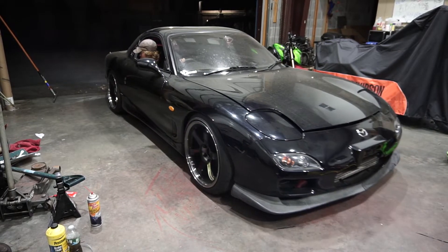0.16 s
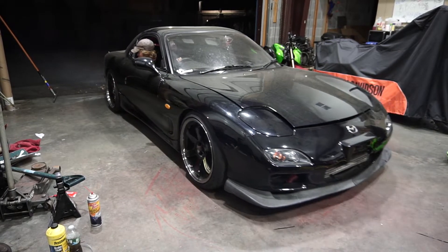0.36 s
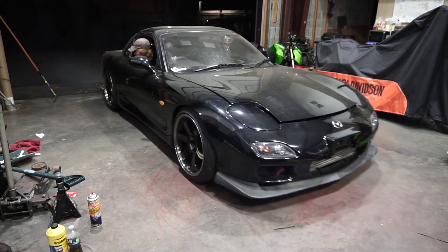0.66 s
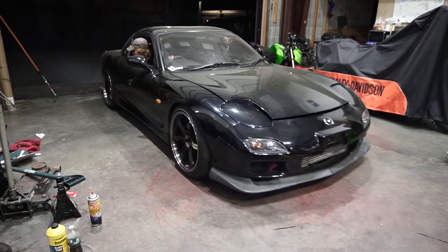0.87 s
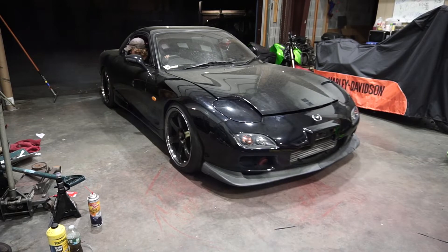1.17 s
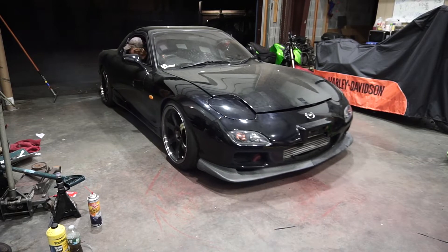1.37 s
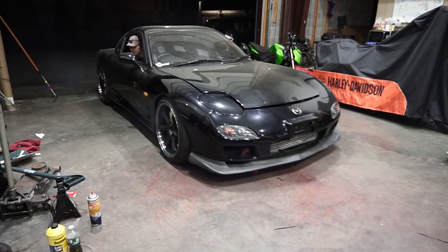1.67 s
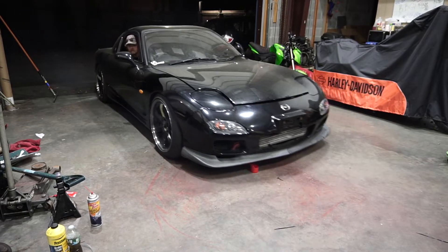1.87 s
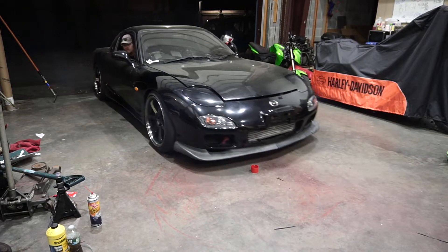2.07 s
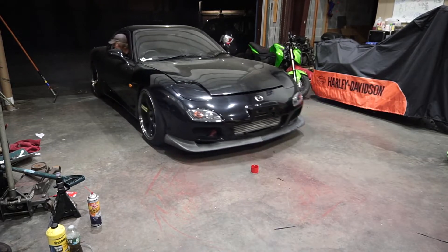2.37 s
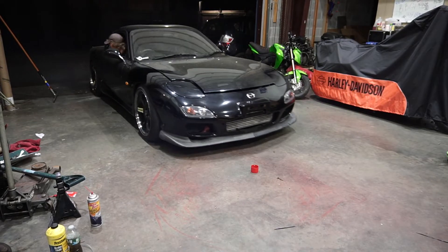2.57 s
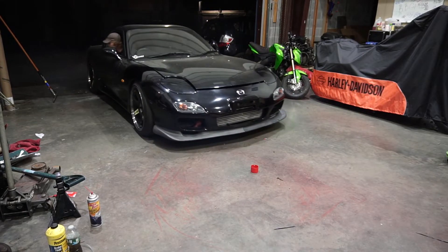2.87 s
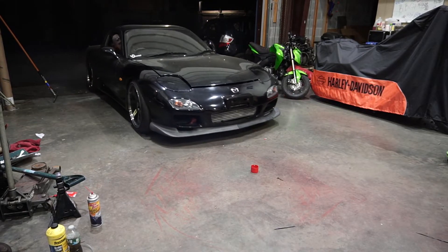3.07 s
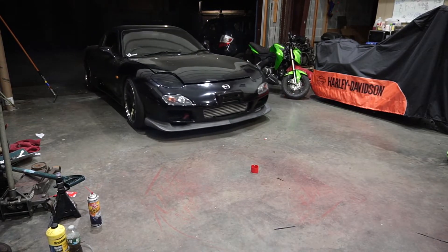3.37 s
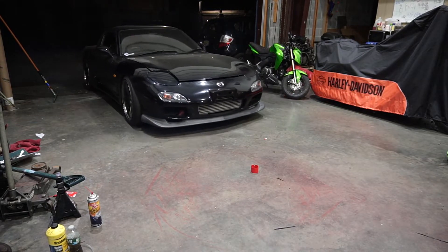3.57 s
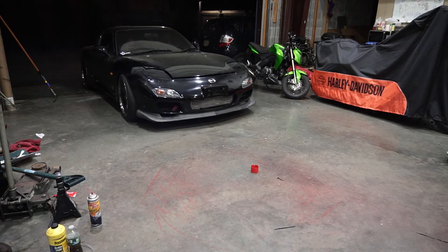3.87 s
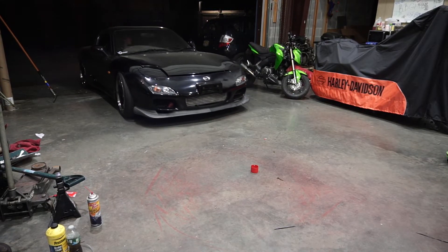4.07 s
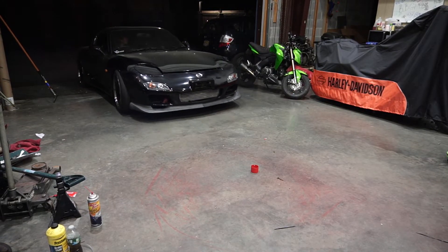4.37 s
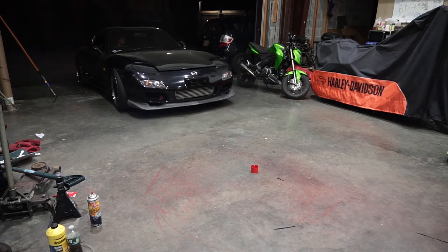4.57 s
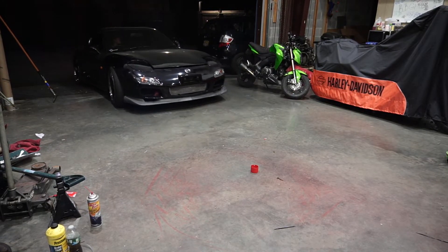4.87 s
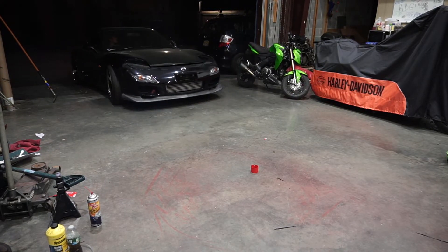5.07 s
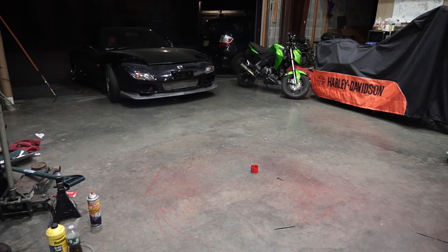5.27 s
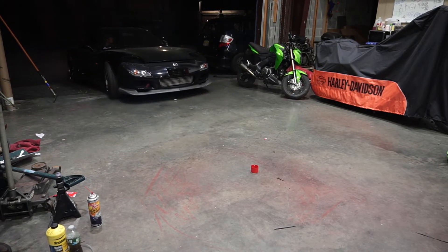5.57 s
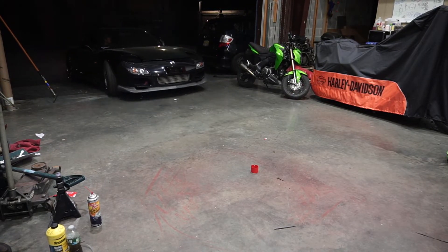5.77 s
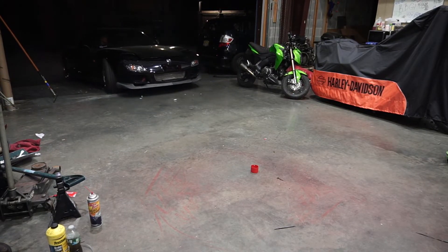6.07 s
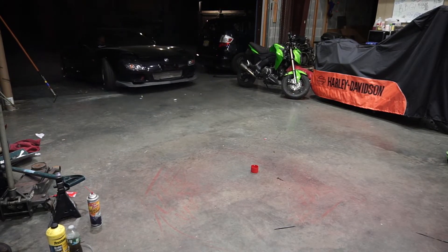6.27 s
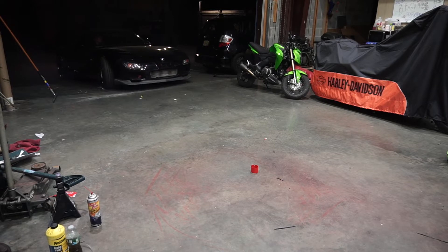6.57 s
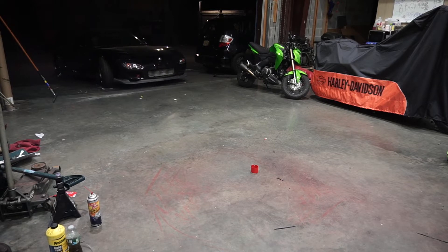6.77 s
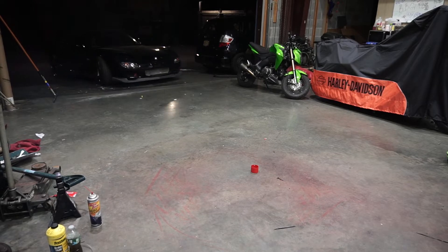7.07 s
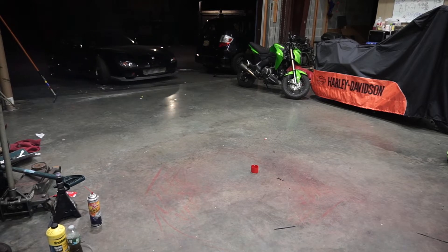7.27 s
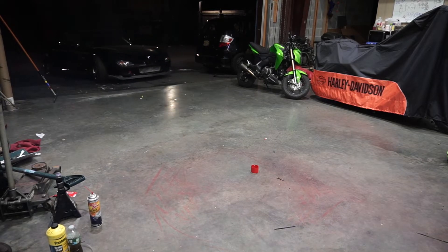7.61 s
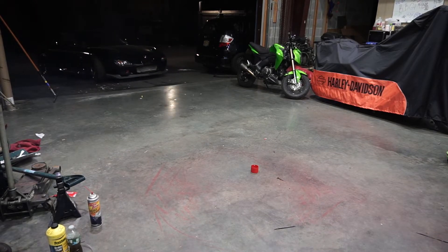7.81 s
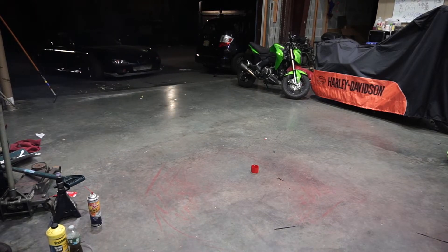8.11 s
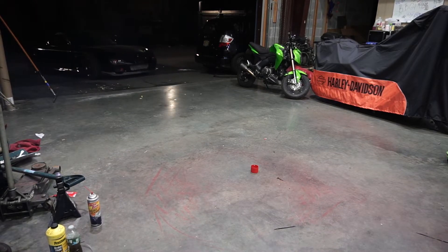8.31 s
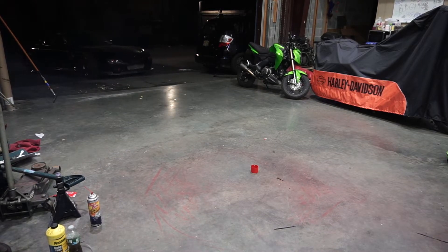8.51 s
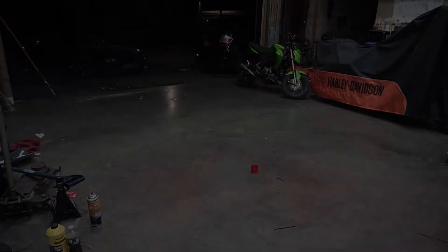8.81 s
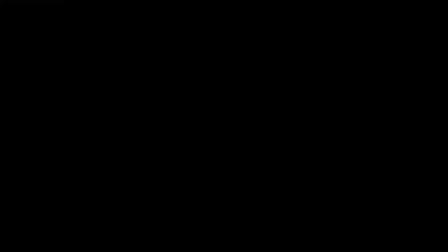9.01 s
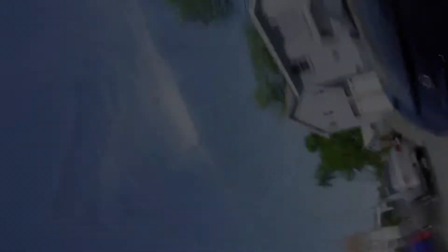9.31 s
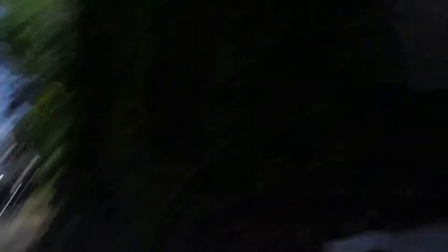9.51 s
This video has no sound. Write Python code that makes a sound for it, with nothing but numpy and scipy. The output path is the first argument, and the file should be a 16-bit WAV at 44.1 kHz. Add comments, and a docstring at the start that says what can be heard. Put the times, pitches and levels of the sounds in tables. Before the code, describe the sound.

From 0 s a rotary-engined car idles loudly near a fixed microphone in a concrete workshop. Its exhaust fires in uneven clumps of hollow, ringing pops, roughly two to five at a time, separated by misfire gaps; runs often start weak and end strong. Rough mechanical clatter and a low throb lie beneath, with gas hiss and metallic panel buzz. As the car backs away, the rhythm quickens slightly from about 2.4 s and a bright crack follows each pop from a wall, strongest between 3 and 6 s, its delay shrinking. A thin, high brake squeal flutters faintly at 2.7-3.1 s. By 7-8.7 s the chopping is weaker and more distant, in regular lumps with short room tails. Around 8.9 s wind swells in; from 9.1 to 9.65 s heavy low buffeting, roar, ticks and plastic rattles overwhelm the engine, clipping at peaks.

```python
"""A rotary-engined car with a choppy idle backs out of a workshop: uneven runs of pops between misfires ring its pipe.
Each pop returns from a wall behind the car as a bright crack, sooner as the car nears the wall; gas hisses and panels
buzz after it. Engine-bay noise is puffed once per chamber over a sine throb, and a brake squeals once as a fluttering
tone. Sparse tails give the room. At the end the workshop dips away under noise swings, roar and rattles: a microphone
buffeted by wind on a moving car."""
import sys
import numpy as np
from scipy import signal
from scipy.fft import rfft, irfft, next_fast_len
from scipy.io import wavfile
from scipy.ndimage import uniform_filter1d

SR = 44100
rng = np.random.default_rng(int(sys.argv[2]) if len(sys.argv) > 2 else 0)


def dump(signal):
    """Clip the signal to [-1, 1] and save it as 16-bit WAV at the path in sys.argv[1]."""
    limited = np.clip(np.atleast_2d(signal).T, -1, 1)
    pcm = np.round(limited * 32767).astype(np.int16)
    wavfile.write(sys.argv[1], SR, pcm)


N = 425560

# The car backing away: (time [s], chambers passing [1/s], wall echo delay [ms],
# surge: how far the spacing of the pops tightens through a run [share])
CAR_MOTION = [(0.0, 40.7, 73.0, .03), (.4, 41.3, 72.4, .10), (0.6, 41.6, 72.0, .06), (1.2, 46.4, 70.6, .07),
              (1.8, 35.1, 69.1, 0), (2.05, 38, 68.1, .11), (2.4, 42.2, 66.8, .02), (3.6, 46.9, 62.8, .04),
              (4.2, 51.4, 60.5, .05), (6.0, 53.5, 52.2, .02), (8.4, 53.9, 40.7, .04),
              (9.0, 52.0, 38.9, .04)]


def exhaust():
    """Every pop rings the pipe, cracks off the wall, hisses and shakes the panels; a weak one loses more crack than thump."""
    # Pop and wall crack before the mix: (time [s], pop level [dB], crack level [dB])
    pop_levels = [(0.0, -4, -30), (1.2, -2.5, -21.5), (1.5, -4.5, -20.5), (1.8, -6, -40),
                  (2.1, -5.5, -19.5), (2.6, -7, -25), (2.9, -4.5, -14.5), (3.1, -3, -12), (5.4, -4, -7),
                  (6.2, -3, -13), (6.8, -3.5, -13.5), (7.3, -6, -19), (7.8, -6.5, -29), (9.0, -7.5, -22.5)]
    weak_thump_db, weak_from_db = -8, -16  # the most a weak charge takes off the thump, and about where
    s, strength_db = pops()
    strength_db = strength_db + 1.0 * rng.standard_normal(len(s))  # chance from pop to pop
    pop_db, crack_db = curves(pop_levels, s)
    far = distance(s)
    weakness = np.tanh((np.minimum(strength_db, 0) / weak_from_db) ** 2)
    thump_db = pop_db + weak_thump_db * weakness
    back = s + curves(CAR_MOTION, s)[1] / 1000
    back_db = crack_db + strength_db
    thump = pipe(s, thump_db, back, back_db, far)
    crack = wall_crack(s, thump_db, back, back_db, far)
    blast = soften(thump, ms=0.2) + pressure_front(s, thump_db)
    blast = highpass(blast, 105)  # an open pipe sends out no steady flow
    body = gain_of(-8.5) * blast + gas_hiss(s, thump_db, far) + panel_buzz(s, thump_db, far)
    return body, gain_of(-2.5) * soften(crack, ms=0.034)


def pops():
    """Times and strengths of all pops: each run fires on every second chamber and slides from first to last strength."""
    # Runs of the rotors between misfires, strengths against a full charge:
    # (first pop [s], last pop [s], first strength [dB], last strength [dB])
    firing_runs = [(0.0055, 0.0055, -19, -19), (0.0712, 0.268, 0, 1), (0.0964, 0.2928, 5, 5),
                   (0.3751, 0.5764, -12, -3), (0.4021, 0.5522, -6, -9), (0.6797, 0.7776, -7, -2),
                   (0.7046, 0.8, 4, -3), (0.9182, 1.0099, -12, 1), (0.9435, 1.0299, -8, 2),
                   (1.138, 1.2233, -12, 5), (1.1613, 1.2437, 0, 2), (1.3509, 1.439, -12, -1),
                   (1.3741, 1.4601, -11, -2), (1.5563, 1.5563, -2, -2), (1.5838, 1.6988, -14, 0),
                   (1.6716, 1.7273, -12, -2), (1.7885, 1.9126, -16, -7), (1.821, 1.9992, -2, -6),
                   (2.028, 2.2366, -1, 1), (2.0558, 2.1125, -6, 3), (2.1641, 2.2132, -2, -8),
                   (2.3119, 2.5039, -12, 4), (2.3365, 2.3365, -10, -10), (2.4327, 2.4327, 2, 2),
                   (2.5266, 2.5266, 0, 0), (2.5998, 2.6911, -4, 6), (2.6232, 2.7134, -1, 3),
                   (2.8075, 2.8075, 0, 0), (2.8324, 2.9265, -12, -2), (2.904, 2.992, -10, 3),
                   (3.039, 3.039, -13, -13), (3.0873, 3.0873, -8, -8), (3.1108, 3.1567, -24, -2),
                   (3.1792, 3.1792, -12, -12), (3.2009, 3.2009, -10, -10), (3.2666, 3.3565, 2, -5),
                   (3.3347, 3.4193, -31, 4), (3.4858, 3.4858, -18, -18), (3.5314, 3.5314, -10, -10),
                   (3.5556, 3.6801, -28, 3), (3.5772, 3.6193, -9, -22), (3.7462, 3.832, -10, -3),
                   (3.8532, 3.9344, -13, 3), (3.9545, 4.0366, -18, -2), (4.0983, 4.0983, -6, -6),
                   (4.1396, 4.1796, -1, -3), (4.1995, 4.2383, -9, -2), (4.34, 4.4198, -11, -5),
                   (4.4008, 4.4769, -12, -2), (4.5353, 4.6174, -8, -1), (4.6363, 4.7137, -14, 2),
                   (4.773, 4.8528, -6, -2), (4.8333, 4.872, -12, -10), (4.91, 4.91, -2, -2),
                   (5.011, 5.0521, -11, -5), (5.0713, 5.1481, -13, -6), (5.0923, 5.0923, -10, -10),
                   (5.207, 5.2856, -12, 2), (5.305, 5.3826, -14, -1), (5.4402, 5.4797, -7, -5),
                   (5.5377, 5.5772, -11, -5), (5.6365, 5.7148, -9, -2), (5.7326, 5.8075, -13, -1),
                   (5.865, 5.9417, -9, -3), (5.9223, 5.996, -12, -6), (6.0925, 6.17, -11, 0),
                   (6.1511, 6.2231, -11, -4), (6.3183, 6.3568, -6, -4), (6.3947, 6.3947, -13, -13),
                   (6.3756, 6.3756, -14, -14), (6.4128, 6.4128, -7, -7), (6.509, 6.5861, -11, 1),
                   (6.5674, 6.6398, -12, 0), (6.7351, 6.8115, -9, 1), (6.7927, 6.865, -26, -3),
                   (6.961, 7.035, -7, -1), (6.98, 7.0529, -13, 3), (7.1484, 7.2274, -8, -4),
                   (7.2079, 7.2816, -12, 2), (7.3785, 7.4541, -9, 4), (7.3984, 7.4712, -23, -3),
                   (7.6076, 7.6813, -11, 1), (7.6272, 7.699, -10, -5), (7.8315, 7.9054, -13, -4),
                   (7.851, 7.9238, -13, -1), (8.017, 8.094, -10, 0), (8.0382, 8.1118, -35, 4),
                   (8.2303, 8.3448, -36, -9), (8.2515, 8.3266, -23, -1), (8.466, 8.5424, -14, -4),
                   (8.4861, 8.5606, -31, -3), (8.6563, 8.6563, -28, -28), (8.6963, 8.736, -6, -24),
                   (8.7168, 8.7907, -16, -6), (8.8883, 8.9648, -10, -7), (8.9467, 9.0199, -30, -5),
                   (9.0776, 9.1561, -12, 3)]
    catch = 1.3  # exponent: above 1, the strength moves faster early in the run
    s, db = [], []
    for first, last, first_db, last_db in firing_runs:
        last = max(first, last)
        chamber_rate = curves(CAR_MOTION, (first + last) / 2)[0]
        u = np.linspace(0, 1, 1 + round((last - first) * chamber_rate / 2))
        surge = curves(CAR_MOTION, first)[2]
        s.extend(first + (last - first) * (u + surge * u * (1 - u)))
        db.extend(last_db + (first_db - last_db) * (1 - u) ** catch)
    order = np.argsort(s)
    return np.array(s)[order], np.array(db)[order]


def distance(s):
    """0 with the car near, 1 with the car far, read from the wall echo delay."""
    delay_ms = np.transpose(CAR_MOTION)[2]
    return (delay_ms.max() - curves(CAR_MOTION, s)[1]) / np.ptp(delay_ms)


def pipe(s, thump_db, back, back_db, far):
    """Modes of pipe and underbody, rung by each pop, its floor bounce and its return from the wall."""
    # Exhaust pipe and underbody: (frequency [Hz], width [Hz], then one level [dB] for each station)
    pipe_modes = [(166, 66, -13, -9, -20.5, -27), (222.5, 58, -4, -9.5, -14.5, -27),
                  (288, 260, -30, -33, -27, -30), (327.3, 42, -14.5, -14, -13, -4.5),
                  (340.3, 53, -1, -5.5, -6, -7.5), (464, 84.2, -11, -8.5, -13.5, -2),
                  (542, 71, -2.5, -9.5, -13.5, -13.5), (670, 52, -7, -5, -9, -8),
                  (895, 154, -20, -21, -7, -2.5), (1030, 160, -36, -6, -6.5, 2),
                  (1110, 89, -26, -8, -10, -5.5), (1600, 530, -15, -10, -20, 2)]
    # Stations of the car: (distance [0 near to 1 far])
    car_stations = [0, .2, .5, 1]
    stagger_ms = 0.063  # the modes do not all start at the same instant
    floor_db = between(far, -14, -17.5)
    thump = 0
    for hz, width, *station_db in pipe_modes:
        chance, late = rng.standard_normal((2, len(s)))
        db = np.interp(far, car_stations, station_db) + 0.41 * chance
        start = s + stagger_ms / 1000 * abs(late)
        drive = with_floor(start, thump_db + db, floor_db)
        drive = drive + clicks(back, -gain_of(back_db + db - 10.5))
        thump = thump + ring(drive, hz, width)
    return thump


def wall_crack(s, thump_db, back, back_db, far):
    """The tailpipe mouth heard through the wall echo; a rough wall returns each colour at its own moment."""
    # Tailpipe mouth: (frequency [Hz], width [Hz], level near [dB], level far [dB])
    mouth_modes = [(780, 830, -1, 2.5), (2303, 187, -7.5, -7.5), (3410, 320, -3.5, -6),
                   (4870, 350, -14.5, -4.5), (5620, 490, -14, -2), (7000, 2400, -32, -28)]
    direct_db = -27.5  # a little of the crack also arrives with the pop itself
    crack = 0
    for hz, width, near_db, far_db in mouth_modes:
        chance, late = rng.standard_normal((2, len(s)))
        db = between(far, near_db, far_db) + 2 * chance
        start = back + .0004 * late
        drive = with_floor(start, back_db + db, -10)
        drive = drive + clicks(s, -gain_of(thump_db + db + direct_db))
        crack = crack + ring(drive, hz, width)
    return crack


def with_floor(s, db, floor_db):
    """Negative clicks that floor and underbody send on a second time."""
    floor_ms = 3.708
    return clicks(s, -gain_of(db)) + clicks(s + floor_ms / 1000, -gain_of(db + floor_db))


def pressure_front(s, thump_db):
    """The bare pressure front that leads each pop, and its inverted return from the pipe end."""
    front_db, front_ms = -2, 0.12
    rebound_db, rebound_ms = -12, 1.462
    rebound = clicks(s + rebound_ms / 1000, gain_of(thump_db + front_db + rebound_db))
    fronts = rebound - clicks(s, gain_of(thump_db + front_db))
    return front_ms * SR / 400 * soften(fronts, front_ms)  # bells of about the clicks' height


def gas_hiss(s, thump_db, far):
    """Burnt gas hisses out after each pop: coloured noise under a dying envelope."""
    # Colour of the hiss: (frequency [Hz], level [dB])
    gas_colour = [(800, -12), (1500, 8), (2400, 10), (3400, -6), (5500, -9), (8000, -32.5), (11000, -32)]
    far_db = -2  # the hiss carries less well than the pop
    rush = ring(clicks(s, gain_of(thump_db + far_db * far)), 0, width=39.0)
    return gain_of(-35.5) * rush * evened(coloured(rng.standard_normal(N), gas_colour))


def panel_buzz(s, thump_db, far):
    """Sheet metal set buzzing by the pops; it also rings cleanly a moment after each."""
    # Panel modes: (frequency [Hz], width [Hz], level [dB])
    panel_modes = [(774, 117, -13), (925, 87, 5), (1107, 73, -3.5), (1270, 70, -12.5)]
    late_ms = 12.5
    shaken = ring(clicks(s, gain_of(thump_db + between(far, -34.5, -38))), 0, width=13.3)
    noise = rng.standard_normal(N)
    rough = evened(sum(gain_of(db) * ring(noise, hz, width) for hz, width, db in panel_modes))
    knocks = clicks(s + late_ms / 1000, gain_of(thump_db + between(far, -19.5, -48)))
    clean = 0
    for hz, width, db in panel_modes:
        # two rings in a row let the note swell before it dies
        clean = clean + gain_of(db) * width / 5000 * ring(ring(knocks, hz, width), hz, width)
    return uniform_filter1d(shaken, size=400) * rough + clean


def bay():
    """Mechanical noise puffed once per chamber, and the first two orders of the chamber rate; both ease between runs."""
    # Engine bay before easing: (time [s], clatter level [dB], throb level under full load [dB])
    bay_levels = [(0.0, -27.5, -22.5), (0.8, -29, -26.5), (1.5, -28.5, -31), (1.87, -31.5, -24),
                  (2.3, -28.5, -29), (3.2, -30.5, -32.5), (4.6, -29.5, -47), (5.8, -30, -50),
                  (6.3, -31.5, -38), (7.8, -33.5, -39), (8.7, -35, -34)]
    # Colour of the clatter: (frequency [Hz], level [dB])
    clatter_colour = [(24, -54), (40, -3), (65, -1), (102, -12.5), (153, -1), (256, -6), (332, 4.5),
                      (429, -3.5), (955, -7.5), (1420, -16.5), (2390, -21.5), (2750, -29), (3240, -22.5),
                      (4300, -32.5), (5190, -28), (7500, -45.5), (11000, -48.5), (14300, -89),
                      (22000, -120)]
    load_s, throb_idle_db, clatter_idle_db = .07, -20, -2
    clatter_db, throb_db = curves(bay_levels)
    turns, s = chambers(), pops()[0]
    # share of the chambers around each moment that fire
    load = uniform_filter1d(clicks(s, 1 / curves(CAR_MOTION, s)[0]) * SR, round(load_s * SR))
    idle = 1 - np.clip(uniform_filter1d(load, size=1000), 0, 1)
    throb_db = throb_db + throb_idle_db * idle
    clatter_db = clatter_db + clatter_idle_db * idle
    puffs = (.5 + np.exp(-(turns % 1) / 0.69)) * rng.standard_normal(N)
    # the second order leads at first, while the car is near; later the first order does
    second_db = np.interp(np.arange(N) / SR, [0, 3, 5, 9], [6, 5, -9, -10])
    first, second = gain_of(-second_db), gain_of(second_db)
    throb = first * np.sin(2 * np.pi * turns) + second * np.sin(2 * 2 * np.pi * turns)
    throb = throb / np.hypot(first, second) * (turns < turns[-1])  # silent after the last pop
    return gain_of(clatter_db) * evened(coloured(puffs, clatter_colour)) + gain_of(throb_db - 5.5) * throb


def chambers():
    """Chambers passed so far: a whole number at every pop from the second on, the misfires counted in between."""
    s = pops()[0]
    passed = np.cumsum(np.round(np.diff(s) * curves(CAR_MOTION, s[1:])[0]))
    return np.interp(np.arange(N) / SR, s[1:], passed)


def brake():
    """A thin stick-slip tone that swells, flutters and dies."""
    start_s, top_s, end_s = 2.73, 2.84, 3.1
    squeal_hz, top_db, ends_db = 3500, -38, -56
    flutter_hz, flutter_db, flutter_top_s = 21.5, 3, 2.878
    t = np.arange(N) / SR
    on = np.clip(np.minimum(t - start_s, end_s - t) / 0.012, 0, 1)
    db = np.interp(t, [start_s, top_s, end_s], [ends_db, top_db, ends_db])
    db = db + flutter_db * np.cos(2 * np.pi * flutter_hz * (t - flutter_top_s))
    db = db + 2.5 * evened(uniform_filter1d(rng.standard_normal(N), 500))  # irregular wavering
    return np.sqrt(2) * on * gain_of(db) * np.sin(2 * np.pi * squeal_hz * t)


def shop(x):
    """The room: three sparse tails, each band dying at its own speed, weighted in slow rotation."""
    # Reverberation of the workshop: (frequency [Hz], time to fall by 60 dB [s])
    shop_decay = [(100, 0.22), (400, 0.22), (1200, 0.31), (4000, 0.61), (10000, 0.21)]
    taps = np.zeros((3, SR // 2))
    # one tap of random sign at a random place in every 20 samples
    at = np.arange(180, SR // 2 - 20, 20) + rng.integers(0, 20, (3, (SR // 2 - 181) // 20))
    np.put_along_axis(taps, at, rng.choice([-1., 1.], at.shape), 1)
    hz, t, z = signal.stft(taps, SR, nperseg=256)
    decay = gain_of(-60 * t / read(shop_decay, hz)[:, None])
    tails = signal.istft(z * decay, SR, nperseg=256)[1]
    turn = 2 * np.pi * (0.3997 * np.arange(N) / SR + np.arange(3)[:, None] / 3)
    sends = np.sqrt(2 / 3) * np.cos(turn) * x
    wet = signal.oaconvolve(sends, tails / np.linalg.norm(tails[0]), axes=1)
    return wet.sum(0)[:N]


def wind():
    """Slow pressure swings of rather even size, a lumpy roar above them, and the rattles."""
    # Gusts: (time [s], buffet level [dB], roar level [dB])
    gust_levels = [(8.6, -45, -41), (8.68, -38, -48), (8.712, -33, -40), (8.864, -15.5, -52),
                   (8.874, -17.5, -44), (9.118, -13, -18.5), (9.162, -8.5, -32), (9.206, -7, -23.5),
                   (9.492, -7, -18), (9.516, -6.5, -10.5), (9.538, -9.5, -34), (9.606, -3.5, -32),
                   (9.65, -4.5, -25)]
    # Colour of the swings: (frequency [Hz], level [dB])
    buffet_colour = [(5, -26), (10, -4), (15, 0), (22, -6), (35, -15), (55, -21), (85, -34), (200, -90)]
    # Colour of the roar: (frequency [Hz], level [dB])
    roar_colour = [(40, -9), (70, -1.5), (200, -14.5), (350, -27), (800, -28.5), (2000, -44), (10000, -65)]
    # Housing rattles: (time [s], chatter level [dB], length [s], buzz [Hz], knock level [dB], knock [Hz])
    rattle_rows = [(9.053, -9, 0.0024, 2570, -13.5, 400), (9.098, -35, .004, 4750, -36, 300),
                   (9.147, -26, 0.0053, 2580, -27, 296), (9.193, -30, 0.0087, 2690, -29, 250),
                   (9.203, -24, 0.0048, 3970, -31, 250), (9.214, -20.5, 0.015, 2503, -5.5, 184),
                   (9.245, -35, 0.0037, 2500, -18, 302), (9.267, -13.5, 0.0077, 3820, -16.5, 736),
                   (9.296, -10, 0.0036, 3700, -10.5, 760), (9.304, -28, .003, 3800, -34, 400),
                   (9.326, -27, 0.0021, 4200, -25, 298), (9.355, -23, .002, 4470, -12.5, 300),
                   (9.378, -26, 0.0047, 3650, -30, 300), (9.421, -26, .008, 4050, -24, 300),
                   (9.4323, -10, 0.0074, 3780, -8.5, 280), (9.441, -22, 0.015, 3930, -12, 484),
                   (9.491, -24, 0.005, 3480, -11, 246), (9.518, -28, 0.0034, 3300, -9.5, 97),
                   (9.555, -35, 0.0052, 2380, -33, 250), (9.594, -28.5, 0.013, 2430, -27, 201),
                   (9.611, -27.5, 0.017, 2550, -31, 249)]
    buffet_db, roar_db = curves(gust_levels)
    rise = np.clip((np.arange(N) / SR - gust_levels[0][0]) / 0.24, 0, 1)
    swings = evened(coloured(rng.standard_normal(N), buffet_colour))
    envelope = abs(signal.hilbert(swings, next_fast_len(N))[:N])
    swings = evened(swings / (envelope + .3) ** .4)  # evens out the size of the swings
    lumps = gain_of(5 * evened(uniform_filter1d(rng.standard_normal(N), 900)))
    roar = evened(coloured(lumps * rng.standard_normal(N), roar_colour))
    rattles = np.zeros((2, N))
    for row in [*rattle_rows, *lesser_rattles()]:
        add(rattles, *rattle(*row))
    # the reversed noise serves as a slight left-right difference
    apart = gain_of(-37.5) * np.array([[1], [-1]])
    swings, roar = swings + apart * swings[::-1], roar + apart * roar[::-1]
    return rise * (gain_of(buffet_db) * swings + gain_of(roar_db) * roar) + rattles


def rattle(s, db, length, hz, knock_db, knock_hz):
    """A tick and a burst of chatter in the housing that breaks off sharply, over one dull knock."""
    # Housing modes: (frequency [Hz], width [Hz], level [dB])
    housing_modes = [(700, 730, -9), (1500, 840, 0), (2400, 930, -7), (3800, 800, -4), (5900, 780, -20),
                     (7350, 570, -17), (11000, 1000, -23)]
    t = np.arange(SR // 8) / SR
    a, b, hits = rng.standard_normal((3, len(t)))
    chatter = (a + .25 * b * np.array([[1], [-1]])) * (abs(hits) > 1.5)  # sparse random hits
    u = t / max(length, .001)
    chatter = gain_of(db - 7.7 * u - 4.5 * np.minimum(u, 3) ** 4) * chatter
    own_note = gain_of(4.5) * ring(chatter, hz, 350)  # the loose part itself
    buzz = own_note + sum(gain_of(d) * ring(chatter, f, w) for f, w, d in housing_modes)
    buzz = signal.lfilter(*signal.butter(2, 8000, fs=SR), buzz)
    tick = gain_of(db - 0.5) * np.exp(-t / 0.00037)
    knock = gain_of(knock_db) * np.sin(2 * np.pi * knock_hz * t) * np.exp(-t * knock_hz * 0.73)
    return s, gain_of(-15.0) * buzz - tick - knock


def lesser_rattles(count=30):
    """Lesser rattles at random moments, one in each equal slot of time, as rows for rattle()."""
    from_s, level_db, length_s, middle_hz = 9.02, -37, .007, 4500
    when, size, pitch = rng.random((count, 3)).T
    s = from_s + (np.arange(count) + when) / count * (N / SR - from_s)
    db = level_db + 12 * (size - .5)
    hz = middle_hz * 3 ** (pitch - .5)
    return [(a, b, length_s, c, level_db - 4, 250) for a, b, c in zip(s, db, hz)]


def gain_of(db):
    """Decibels to amplitude."""
    return 10 ** (np.asarray(db) / 20)


def between(far, near_value, far_value):
    """Slides from the near value to the far value."""
    return near_value + far * (far_value - near_value)


def evened(x):
    """Scales to an RMS of 1."""
    return x / np.sqrt(np.mean(x ** 2) + 1e-20)


def read(points, hz):
    """A curve over frequency, straight on a log axis."""
    f, value = np.transpose(points)
    return np.interp(np.log(hz + 1), np.log(f + 1), value)


def curves(rows, s=None):
    """Every column of a table at the times s, or at every sample."""
    t, *columns = np.transpose(rows)
    return [np.interp(np.arange(N) / SR if s is None else s, t, c) for c in columns]


def clicks(s, size):
    """Single samples of the given sizes at the given times."""
    return np.bincount(np.clip(np.round(s * SR).astype(int), 0, N - 1), size, N)


def ring(x, hz, width):
    """A mode that answers a click with a dying cosine of height 1."""
    pole = np.exp((2j * np.pi * hz - np.pi * width) / SR)
    return signal.lfilter([1, -pole.real], [1, -2 * pole.real, abs(pole) ** 2], x)


def soften(x, ms):
    """Spreads each click into a bell-shaped push of area 1."""
    bell = np.exp(-.5 * (np.arange(-64, 65) / (ms * SR / 1000)) ** 2)
    return np.convolve(x, bell / bell.sum(), "same")


def coloured(x, points):
    """Shapes the spectrum by a curve of levels."""
    size = next_fast_len(N)
    return irfft(rfft(x, size) * gain_of(read(points, np.fft.rfftfreq(size, 1 / SR))), size)[:N]


def highpass(x, hz):
    """A gentle second-order low cut."""
    return signal.lfilter(*signal.butter(2, hz, "highpass", fs=SR), x)


def lowpass(x, hz):
    """A steep linear-phase high cut on both channels."""
    return signal.oaconvolve(x, signal.firwin(511, hz, window=("kaiser", 9), fs=SR)[None], "same")


def add(mix, s, sound):
    """Adds a stereo sound at time s, cut at the end of the mix."""
    part = mix[:, round(s * SR):][:, :sound.shape[1]]
    part += sound[:, :part.shape[1]]


def scene():
    """Car and room through a softly saturating workshop microphone, with the wind over them at the end."""
    # Left-right difference of the room: (frequency [Hz], level [dB])
    room_apart = [(60, -46), (170, -48), (490, -54), (1410, -50), (4030, -33), (11600, -30)]
    # Workshop level, which dips deep and partly returns at the very end: (time [s], level [dB])
    shop_fade = [(8.6, 5), (9.0, 2.5), (9.1, -4.5), (9.2, -4), (9.4, -23), (9.65, -7)]
    up_limit, down_limit = 0.25, 0.38  # saturation before the fade, sooner on the upswing
    thump, crack = exhaust()
    # the crack comes in through the door and stirs the room little
    room = shop(gain_of(-6.0) * thump + gain_of(-13) * crack)
    mid = thump + crack + bay() + brake() + room
    mid = highpass(mid, 45)  # the workshop microphone drops the deepest bass
    limit = np.where(mid > 0, up_limit, down_limit)
    mid = mid / (1 + (mid / limit) ** 4) ** .25
    side = coloured(shop(mid), room_apart)  # mostly the treble differs between the ears
    workshop = lowpass(np.array([mid + side, mid - side]), 11100)
    return gain_of(curves(shop_fade)[0]) * workshop + wind()


def record(dry):
    """Peaks beyond full scale clip, as in the strongest gusts; then the band limit."""
    return np.clip(lowpass(np.clip(dry, -1, 1), 12155), -1, 1)


dry = scene()
out = record(dry)
dump(out)
```